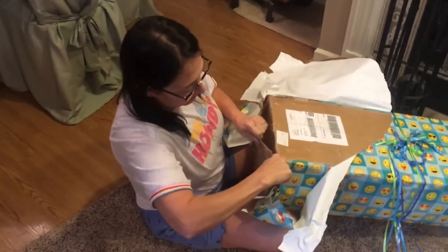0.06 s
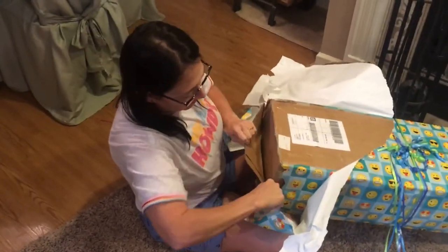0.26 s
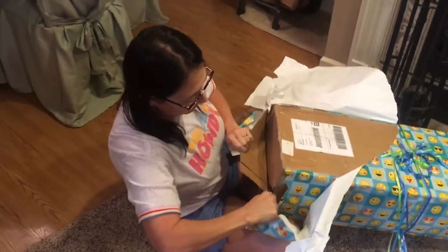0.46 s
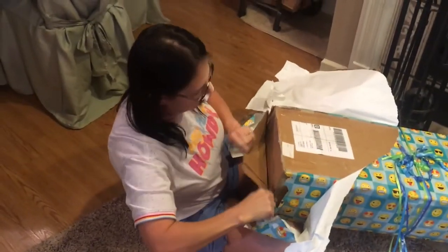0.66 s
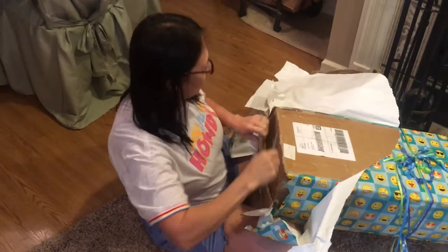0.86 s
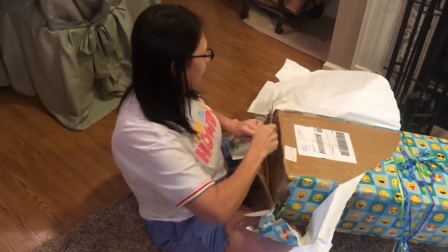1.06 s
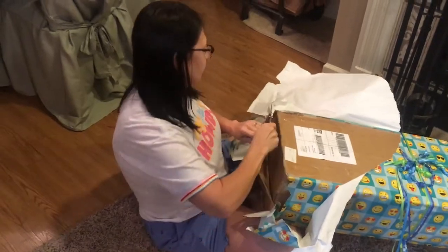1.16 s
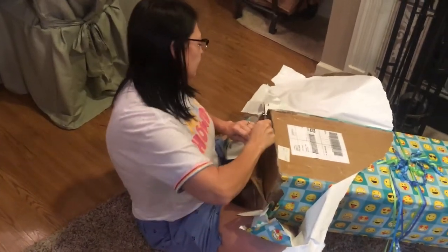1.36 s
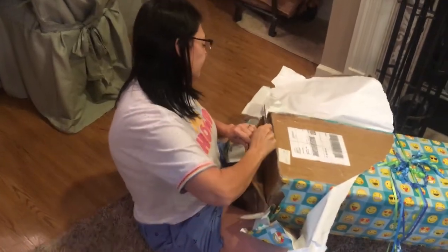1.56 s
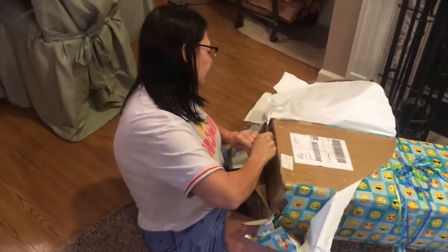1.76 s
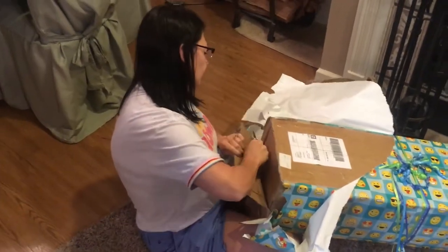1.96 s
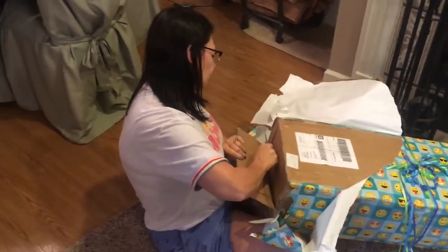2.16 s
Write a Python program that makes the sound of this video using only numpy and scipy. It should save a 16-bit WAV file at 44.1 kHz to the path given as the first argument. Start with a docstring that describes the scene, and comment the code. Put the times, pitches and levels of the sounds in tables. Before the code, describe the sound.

A cardboard box is pulled open. The stiff flap cracks sharply with a hollow thump at about 0.2 seconds and cracks again around 0.5. Wrapping paper then crinkles lightly and cardboard rubs softly. A short scrape and a single snap come near 1.5 seconds, then another burst of cracks with a softer thump at 1.8. The quiet room has a short echo and a faint appliance hum.

```python
"""Pulling open a cardboard box

Hands tug at a stiff end flap in a quiet living room. It lets go in sharp cracks of breaking fibre,
the hollow box thumps, cardboard slides on cardboard and loose wrapping paper ticks as it creases.
Behind it all sit a short room echo, a faint appliance hum and hiss, in mono."""
import sys
import numpy as np
from scipy import signal
from scipy.fft import rfft, irfft, next_fast_len
from scipy.io import wavfile
from scipy.ndimage import uniform_filter1d, map_coordinates

SR = 44100
rng = np.random.default_rng(int(sys.argv[2]) if len(sys.argv) > 2 else 0)


def pcm_store(signal):
    """Save signal as 16-bit PCM."""
    levels = np.round(np.clip(np.atleast_2d(signal), -1, 1) * 32767)
    wavfile.write(sys.argv[1], SR, levels.astype(np.int16).T)


N = 97020

# The flap letting go, plus one finger tap on the box at 1.074 s. Each row: start in seconds, level in dB, t60
# in seconds, bright spot in Hz, # its lift in dB, bass in dB, treble in dB, flap ring against the hit in dB.
FLAP_HITS = [(0.165, -3.5, 0.09, 6000, 1, 9.5, 1, -40), (0.1759, 3, 0.025, 4000, 3, 0.5, -1.5, -45),
             (.181, -5, 0.033, 900, 0, 13, 2, -38), (0.1995, 10.5, 0.028, 4400, 5, 4, -2, -44),
             (0.2044, 2, 0.013, 390, 16, 6, -8, -35), (0.4535, 2, 0.016, 1970, 11.5, -3.5, 0, -13.5),
             (.4599, 4.5, 0.01, 2070, -2.5, -19, -12, -15), (.464, -1.5, 0.0069, 1490, -1, -8, -11, -25),
             (0.5168, 0.5, 0.011, 6000, -2, -9.5, -2, -30), (0.5187, -6.5, .012, 1000, 15, -6, -16, -23),
             (0.5264, -10, .015, 6050, 7, -9, 0, -23), (0.54, -2.5, 0.016, 3670, 8, 1, -2.5, -30),
             (1.074, -22.5, .012, 2270, 13, -23, -23, -16), (1.485, 4, 0.0099, 4920, 9.5, -30, -4.5, -51),
             (1.827, -13.5, 0.057, 5500, 5.5, 5.5, -14, -28),
             (1.8345, 3.5, 0.022, 4180, 13, -10, 8.5, -38), (1.8381, 0, 0.02, 2420, 9.5, 1.5, 10, -26),
             (1.851, -2, 0.037, 3740, 9.5, 6, 0, -40), (1.906, -7, 0.048, 4700, 9, -4, 5, -41),
             (1.917, -10.5, 0.013, 5800, 5, 11, 4, -22)]
# The tone of cracking cardboard. Each row: frequency in Hz, gain in dB.
CRACK_EQ = [(60, -10), (200, 4), (450, -7), (900, 1), (1600, -2), (3000, -3), (4800, -5.5), (6200, 2),
            (7800, -10), (10500, -14.5), (15500, -15.5)]
# The stiff flap's ring. Each row: pitch in Hz, level in dB, t60 in seconds.
FLAP_MODES = [(693, -5.5, 0.076), (1268, -6, 0.074), (1447, -3.5, 0.082), (2040, -3, 0.14),
              (2147, 5.5, 0.042), (2550, -8, 0.055), (3362, 0, 0.018)]
# Jolts to the box. Each row: start in seconds, level in dB, favoured pitch in Hz.
BOX_THUMPS = [(.003, -44.5, 70), (.168, -29.5, 193), (0.2018, -22.5, 192), (0.215, -37, 120),
              (.254, -30.5, 140), (0.498, -37, 150), (0.52, -52, 200), (1.839, -33.5, 148),
              (1.866, -36, 60), (1.926, -43, 60)]
# The hollow body of the box. Each row: pitch in Hz, level in dB, t60 in seconds.
BOX_MODES = [(60, -2.5, 0.28), (77, -5, 0.083), (136, 0.5, 0.16), (149.8, -2, 0.13), (170.7, -3, 0.15),
             (215.5, 4.5, 0.09), (275, -13.5, .18), (331.4, 5.5, 0.078), (396, -1.5, 0.12),
             (576, 8.5, 0.081), (799, 2, 0.061), (999, -1, .18)]
# Creases in the wrapping paper. Each row: start in seconds, level in dB, t60 in seconds,
# pitch in Hz, treble in dB.
PAPER_TICKS = [(0.0267, -24.5, 0.015, 2960, 8), (0.0862, -34, .012, 7000, 11), (0.292, -36, .008, 12000, 3),
               (0.3706, -19.5, 0.0055, 5460, 0), (.42, -17.5, 0.057, 7200, 0),
               (.4472, -16.5, 0.0092, 7100, -9), (0.5869, -13.5, .014, 4470, -4),
               (0.6877, -16.5, 0.022, 3009, -4), (0.7132, -17.5, 0.015, 6060, -5.5),
               (.771, -16, 0.021, 3000, 6), (.818, -14, 0.0086, 3440, 9), (.859, -18.5, 0.022, 3560, 4),
               (1.069, -18.5, 0.035, 3800, 1.5), (1.125, -26, 0.014, 4000, -6),
               (1.133, -28, 0.031, 3500, -3), (1.1693, -18.5, 0.043, 6000, -10),
               (1.178, -18.5, 0.043, 1420, 12), (1.197, -17.5, 0.024, 6000, 4),
               (1.3684, -18.5, 0.041, 6140, -4), (1.6865, -24, .014, 5000, -3),
               (1.724, -20.5, 0.0096, 4730, 6), (1.752, -27.5, 0.0063, 9000, 0),
               (1.76, -22.5, .012, 8900, 0), (2.0578, -25, 0.023, 3050, -14),
               (2.1016, -27.5, .012, 2500, -4), (2.138, -30, 0.011, 8900, 1), (2.152, -20, 0.027, 5500, -6),
               (2.16, -22.5, 0.0087, 5000, -11)]
# The tone of a paper tick. Each row: frequency in Hz, gain in dB.
PAPER_EQ = [(100, -16.5), (600, 1.5), (2000, -2.5), (4500, -3.5), (6200, 2.5), (8000, -7), (15500, -12)]
# Strokes of sliding cardboard. Each row: start, rise, hold and fall in seconds,
# then level, body and treble in dB.
SLIDE_STROKES = [(-.03, 0.013, 0.02, 0.045, -47.5, 7, -9.5), (0.089, 0.024, 0.036, .02, -55, 10, -2),
                 (0.65, 0.11, 0.096, 0.048, -45, -7.5, 8), (1.351, 0.016, 0.1, 0.13, -47.5, 1.5, -1.5),
                 (1.381, 0.092, 0.05, 0.039, -40.5, 5.5, 0), (1.487, 0.02, 0.061, .13, -40, -4, -2.5),
                 (1.855, 0.0074, 0.019, 0.088, -39.5, -1, -9)]
# The tone of rubbing, for slides and crinkle. Each row: frequency in Hz, gain in dB.
RUB_EQ = [(100, -14), (220, -3), (420, -6), (700, -7), (1400, -8), (2200, -11.5), (3500, -7), (4400, -4),
          (5000, -7), (5900, 1.5), (6800, -5.5), (7700, -12), (9200, -13.5), (10500, -28.5), (12500, -18.5),
          (15500, -24)]
# How long the room rings. Each row: frequency in Hz, t60 in seconds.
ROOM_DECAY = [(100, 0.48), (700, 0.43), (2000, 0.35), (5000, 0.36), (13000, 0.41)]
# The tone of the echo's tail. Each row: frequency in Hz, gain in dB.
ROOM_EQ = [(100, 8), (1000, -0.5), (3000, -0.5), (6000, -2), (9000, -2), (15000, -2.5)]
# The tone of the room's hiss. Each row: frequency in Hz, gain in dB.
HISS_EQ = [(25, -5), (60, 4), (95, -2.5), (170, -2.5), (285, -8.5), (480, -14), (900, -28.5), (1500, -26),
           (2700, -22.5), (3700, -34), (5900, -32), (6600, -42), (7300, -46), (10500, -33), (16000, -33)]
# The appliance's hum. Each row: pitch in Hz, level in dB.
HUM_PARTIALS = [(120, -69), (239, -60.5)]

BASS_HZ, TREBLE_HZ = 800, 7800  # shelf corners
SPOT_WIDTH_OCT, SNAP_GRIT = 0.33, 0.9
THUMP_ATTACK_S, THUMP_FOCUS_DB, THUMP_WIDTH_OCT = 0.003, 20, 1.5
TICK_LIFT_DB, TICK_WIDTH_OCT = 11.5, 0.94
CRINKLES_PER_S, CRINKLE_DB, CRINKLE_SPREAD_DB = 900, -59, 3
REST_AT_S, REST_WIDTH_S, REST_DIP_DB = 1.0, 0.014, 4.5  # the hands change grip
SLIDE_FADE_DB, SLIDE_BODY_HZ, SLIPS_PER_S, SLIP_SHARE = 18.5, 1480, 1700, 0.43
FLUTTER_DB, FLUTTER_PER_S = 2.5, 59.78
TAIL_DB, EARLY_DB, EARLY_T60_S, FLOOR_BOUNCE_S, TURNS_PER_S = -8.5, -7.5, 0.037, 0.004, 300
HISS_DB = -56
LOW_CUT_HZ, TOP_HZ = 31, 15850


def flap_hits():
    """Each hit is a burst with its own colour, mostly breaking fibres, once a finger tap, and sets the stiff
    flap ringing."""
    out, t = np.zeros(N), np.arange(SR // 4) / SR
    for start, db, t60, spot_hz, spot_db, bass_db, treble_db, ring_db in FLAP_HITS:
        colour = lambda hz: (along(CRACK_EQ, hz) + spot_db * bell(hz, spot_hz, SPOT_WIDTH_OCT)
                             + bass_db * below(hz, BASS_HZ) + treble_db * (1 - below(hz, TREBLE_HZ)))
        add(out, start, amp(db) * snap(t60, colour))
        ring = sum(amp(level - 60 * t / mode_t60) * np.sin(2 * np.pi * (hz * t + rng.random()))
                   for hz, level, mode_t60 in FLAP_MODES)
        add(out, start, amp(db + ring_db) * ring / len(FLAP_MODES))
    return out


def box_thumps():
    """The hollow box booms when jolted; each jolt favours the modes around its own pitch."""
    out, t = np.zeros(N), np.arange(SR // 2) / SR
    attack = 1 - np.exp(-t / THUMP_ATTACK_S)
    for start, db, pitch_hz in BOX_THUMPS:
        ring = np.zeros(len(t))
        for hz, level, t60 in BOX_MODES:
            focus_db = THUMP_FOCUS_DB * (bell(hz, pitch_hz, THUMP_WIDTH_OCT) - 1)
            envelope = amp(level + focus_db + rng.normal(0, 1) - 60 * t / t60)
            ring += envelope * np.sin(2 * np.pi * hz * t + rng.normal(0, 0.41))
        add(out, start, amp(db) * ring * attack)
    return out


def wrapping_paper():
    """Single creases tick over a faint bed of crinkle, which dips while the hands rest."""
    rest = np.exp(-.5 * ((np.arange(N) / SR - REST_AT_S) / REST_WIDTH_S) ** 2)
    creases = grains(CRINKLES_PER_S, CRINKLE_SPREAD_DB)
    crinkle = unit(filtered(creases, lambda hz: amp(along(RUB_EQ, hz))))
    out = amp(CRINKLE_DB - REST_DIP_DB * rest) * crinkle
    for start, db, t60, pitch_hz, treble_db in PAPER_TICKS:
        colour = lambda hz: (along(PAPER_EQ, hz) + TICK_LIFT_DB * bell(hz, pitch_hz, TICK_WIDTH_OCT)
                             + treble_db * (1 - below(hz, TREBLE_HZ)))
        add(out, start, amp(db) * snap(t60, colour))
    return out


def cardboard_slides():
    """Cardboard rubs on cardboard: a hiss, gritty with tiny slips, that swells, holds and fades."""
    out, t = np.zeros(N), np.arange(N) / SR
    for start, rise, hold, fall, db, body_db, treble_db in SLIDE_STROKES:
        friction = rng.standard_normal(N) + SLIP_SHARE * unit(grains(SLIPS_PER_S, spread_db=0.5))
        colour = lambda hz: (along(RUB_EQ, hz) + body_db * below(hz, SLIDE_BODY_HZ)
                             + treble_db * (1 - below(hz, TREBLE_HZ)))
        rub = unit(filtered(friction, lambda hz: amp(colour(hz))))
        fade_in, fade_out = (start + rise - t) / rise, (t - start - rise - hold) / fall
        fade_db = SLIDE_FADE_DB * np.maximum(0, np.maximum(fade_in, fade_out))
        out += rub * (t > start) * amp(db - fade_db + FLUTTER_DB * wobble(FLUTTER_PER_S))
    return out


def room_echo(x, sections=6):
    """The bending cardboard radiates in changing directions, so the echo never repeats."""
    out, angle = np.zeros(N), wobble(TURNS_PER_S)
    for part in np.array_split(np.arange(N), sections):
        for share in (np.cos(angle[part]), np.sin(angle[part])):
            add(out, part[0] / SR, signal.fftconvolve(x[part] * share, room_response()))
    return out


def room_response():
    """One impulse response: near surfaces answer in a quick scatter over a diffuse tail."""
    t = np.arange(SR // 2) / SR
    hz, frame_s, noise = signal.stft(rng.standard_normal(len(t)), SR, nperseg=256)
    decay = amp(along(ROOM_EQ, hz)[:, None] - 60 * frame_s / along(ROOM_DECAY, hz)[:, None])
    tail = signal.istft(noise * decay, SR, nperseg=256)[1][:len(t)]
    early = rng.standard_normal(len(t)) * (rng.random(len(t)) < .05) * amp(-60 * t / EARLY_T60_S)
    response = amp(TAIL_DB) * tail / np.linalg.norm(tail) + amp(EARLY_DB) * early / np.linalg.norm(early)
    return np.pad(response, (round(FLOOR_BOUNCE_S * SR), 0))


def room_tone():
    """A steady, dark hiss under the slightly wavering hum of an appliance."""
    t = np.arange(N) / SR
    hiss = amp(HISS_DB) * unit(filtered(rng.standard_normal(N), lambda hz: amp(along(HISS_EQ, hz))))
    hum = sum(amp(db) * unit(np.sin(2 * np.pi * hz * t + 0.38 * wobble(6.9))) for hz, db in HUM_PARTIALS)
    return hiss + hum


def snap(t60, colour_db, size=4096):
    """A sharp hit: a gritty, fast-dying burst, flattened in tone and then given its colour."""
    t, hz = np.arange(size) / SR, np.fft.rfftfreq(size, 1 / SR)
    grit = rng.standard_normal(size) * np.exp(SNAP_GRIT * rng.standard_normal(size))
    burst = rfft(grit * amp(-60 * t / t60))
    burst /= np.sqrt(np.abs(uniform_filter1d(np.abs(burst) ** 2, size=120)) + 1e-12)
    # A minimum-phase EQ keeps the attack sharp.
    cepstrum = irfft(np.log(unit(amp(colour_db(hz))) + 1e-6))
    cepstrum[1:size // 2] *= 2
    cepstrum[size // 2 + 1:] = 0
    return irfft(burst * np.exp(rfft(cepstrum)))[:size // 2]


def grains(per_s, spread_db):
    """Random clicks of uneven size."""
    return (rng.random(N) < per_s / SR) * rng.choice([-1, 1], N) * amp(spread_db * rng.standard_normal(N))


def wobble(per_s):
    """A smooth random curve with per_s knots a second."""
    return map_coordinates(rng.standard_normal(int(N * per_s / SR) + 4), [np.arange(N) * per_s / SR])


def amp(db):
    """Decibels to gain."""
    return 10 ** (np.asarray(db) / 20)


def unit(x):
    """Scale to rms 1."""
    return x / np.sqrt(np.mean(x ** 2) + 1e-20)


def along(points, hz):
    """Read a curve of (Hz, value) points on a log frequency axis."""
    knots_hz, values = np.transpose(points)
    return np.interp(np.log(hz + 1), np.log(knots_hz + 1), values)


def bell(hz, centre_hz, octaves):
    """An EQ bell of height 1."""
    return np.exp(-.5 * (np.log2((hz + 1) / centre_hz) / octaves) ** 2)


def below(hz, edge_hz):
    """A smooth shelf: 1 under the edge, 0 over it."""
    return 1 / (1 + (hz / edge_hz) ** 4)


def filtered(x, gain):
    """EQ x with a gain that depends on frequency."""
    size = next_fast_len(N + SR // 2)
    return irfft(rfft(x, size) * gain(np.fft.rfftfreq(size, 1 / SR)), size)[:N]


def add(track, start_s, x):
    """Mix x into the track at start_s."""
    i = max(0, round(start_s * SR))
    track[i:i + len(x)] += x[:N - i]


def scene():
    """Cracks, paper and slides feed the echo; thumps and room tone stay dry. Both channels match."""
    close = flap_hits() + wrapping_paper() + cardboard_slides()
    mono = close + room_echo(close) + box_thumps() + room_tone()
    return np.array([mono, mono])


def record(dry):
    """Roll off the deepest bass and cut the very top."""
    low_cut = signal.butter(2, LOW_CUT_HZ, "highpass", fs=SR, output="sos")
    return np.array([filtered(channel, lambda hz: hz < TOP_HZ) for channel in signal.sosfilt(low_cut, dry)])


dry = scene()
out = record(dry)
pcm_store(out)
```